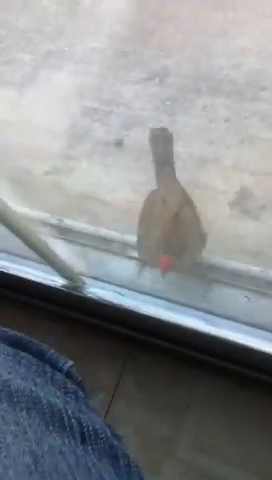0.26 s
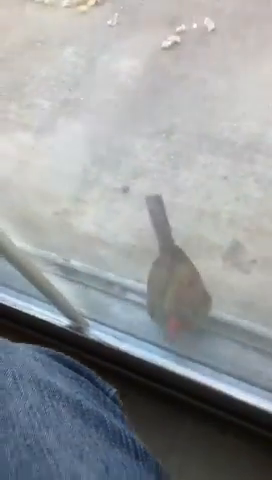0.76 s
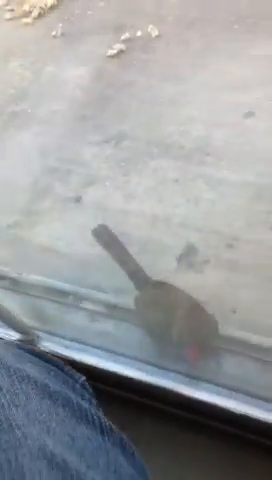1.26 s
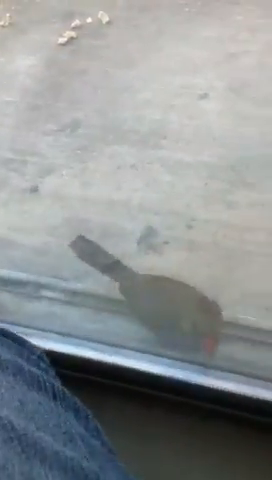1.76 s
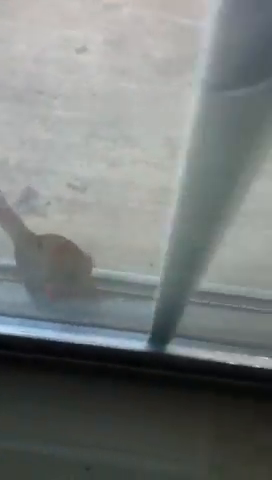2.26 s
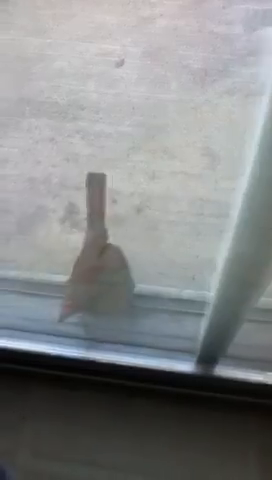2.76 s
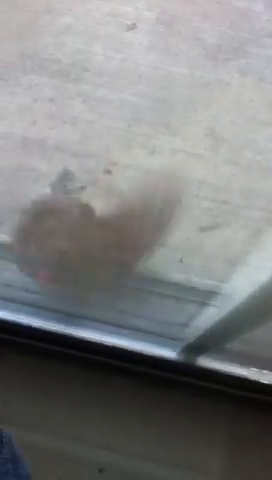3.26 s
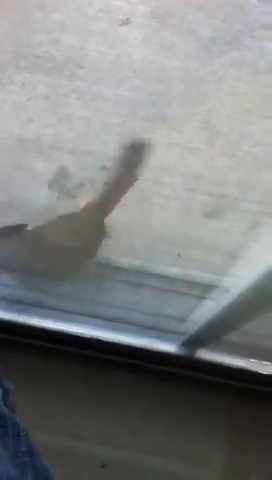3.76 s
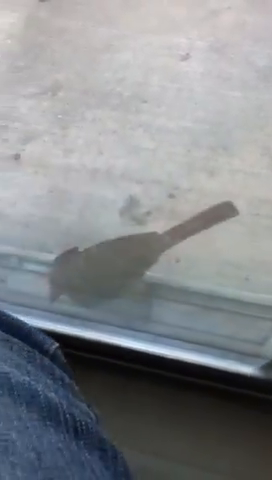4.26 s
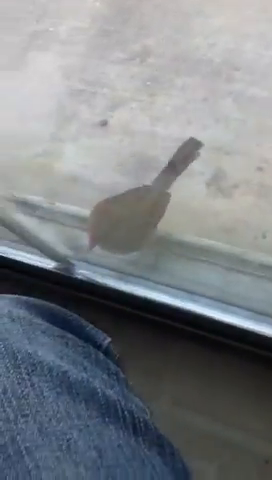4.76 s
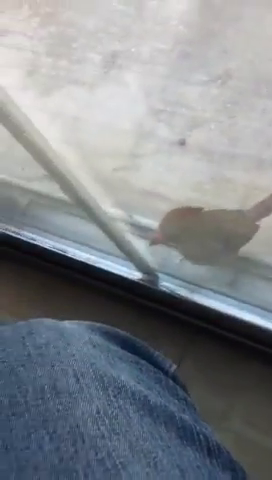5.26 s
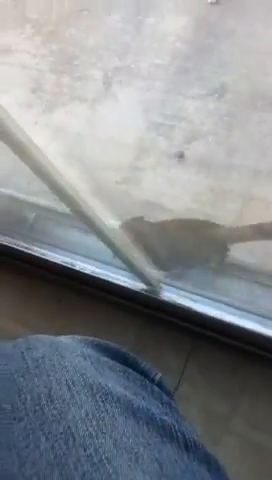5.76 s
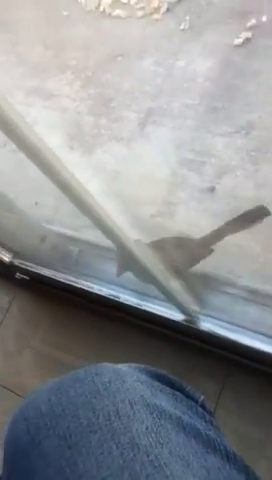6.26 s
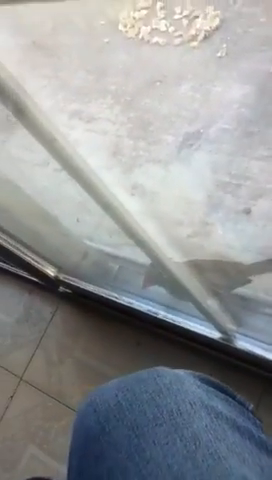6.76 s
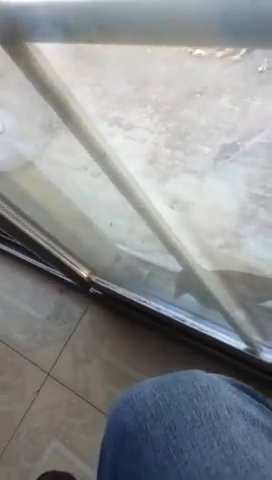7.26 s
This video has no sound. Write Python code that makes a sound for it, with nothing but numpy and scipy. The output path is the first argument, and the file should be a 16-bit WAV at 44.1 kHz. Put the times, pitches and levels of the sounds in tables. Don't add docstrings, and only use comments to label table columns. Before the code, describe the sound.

Irregular glassy pecks, muffled rattling door bumps, gritty claw scratches and soft wing brushes from a bird outside, heard close inside a quiet tiled room.

```python
import sys
import numpy as np
from scipy import signal
from scipy.fft import rfft, irfft
from scipy.io import wavfile
from scipy.ndimage import uniform_filter1d

SR = 44100
rng = np.random.default_rng(int(sys.argv[2]) if len(sys.argv) > 2 else 0)


def wav_record(signal):
    frames = np.transpose(np.atleast_2d(signal))
    bounded = np.clip(frames, -1, 1)
    quanta = np.round(bounded * 32767).astype(np.int16)
    wavfile.write(sys.argv[1], SR, quanta)


def volts(x):
    e = np.asarray(x, float) / 20
    return 10 ** e


N = 330750

# (to the far edge, s*Hz^.5)
PECKS = [(0.651, -32, 0.5, .29), (1.084, -37.5, 3.5, 0.46), (1.139, -38, -3.5, 0.25),
         (1.492, -46, 6.5, 0.61), (2.316, -51, 14, 0.55), (2.727, -54, 14, .43), (3.06, -43.5, 6, 0.56),
         (3.38, -19, -6.5, 0.3), (3.899, -35.5, 3, .36), (4.141, -43.5, -4, .46), (4.224, -36.5, -3, 0.45),
         (4.568, -40, 1.3, .52), (5.025, -48.5, 9.5, 0.56), (5.698, -34.5, 0.5, .38),
         (6.183, -46.5, 9, .44), (6.256, -36.5, -3, 0.47), (7.083, -53, 0, 0.26)]
# start_s, peak_db, treble_db (re bass), tilt_db (per octave), loss_db (per rebound)
BUMPS = [(1.286, -41, -11, -5, 20), (1.566, -19.5, -11.5, -3, 28), (1.579, -8.5, -15, -3.5, 27),
         (1.619, -19, -16.5, -5, 1), (1.662, -15.5, -31, 0.5, 2.5), (1.678, -12.5, -15, -6, 39),
         (1.695, -16, -17, -3, 4.5), (1.909, -24, -9.5, -2.5, 30), (1.925, -20.5, -12.5, -2, 32),
         (1.945, -24, -8.5, -7, 30), (1.969, -15.5, -19, -4, 9), (2.132, -25.5, -15.5, -5, 11),
         (2.18, -23.5, -14.5, -3, 4.5), (2.294, -30.5, -16, -2.5, 28), (2.366, -31, -17.5, -2.5, 20),
         (2.459, -34, -17, -1.5, 20), (2.779, -22.5, -18.5, -6.5, 27), (2.804, -11, -8, -2, 41),
         (2.819, -13, -6, -2, 7), (3.393, -27, -32, -3.5, 4), (3.924, -34.5, -2.5, -3.5, 20),
         (5.897, -35, -11, 4, 3), (6.531, -26, -12.5, 0.5, 2.5), (7.474, -40, -21, 5.5, 20)]
# pitch_hz, level_db, t60_s
DOOR_MODES = [(105.7, -26, 0.63), (149, 2.5, 0.072), (198.1, -3, 0.14), (230.6, -0.5, 0.057),
              (251.5, -2.5, 0.098), (280.6, -13.5, 0.26), (327.7, -0.5, 0.1), (361, -5, 0.16),
              (417.4, -1, 0.14), (527.3, -12, 0.26), (565, -9, 0.12), (605, 1.5, 0.068), (705, -4.5, 0.12),
              (820, -23.5, 0.38), (902, -12, 0.12), (1126, -12.5, 0.1), (1366, -17.5, 0.14),
              (1353, -17, 0.1)]
# pitch_hz, level_db
FRAME_CHATTER = [(530, -25), (900, 6.5), (1670, -2), (1820, -4.5), (3220, -16), (5980, -16.5),
                 (10200, -16.5), (15500, -15)]
# start_s, peak_db, centre_hz, width_octaves
SCRAPES = [(0.6863, -41, 7700, 1.6), (1.096, -38, 3170, 4), (1.1376, -38.5, 3200, 4.8),
           (1.5239, -36.5, 3880, 7.9), (1.5534, -34, 3760, 0.55), (3.458, -35, 5310, 5.5),
           (3.483, -33.5, 3800, 2.4), (3.7154, -47, 7840, 2.5), (3.924, -34.5, 4000, 2.1),
           (3.9414, -39.5, 10400, 0.63), (4.1876, -44.5, 7460, 1.9), (4.2211, -35, 3610, 8.3),
           (4.6164, -32, 4320, 16), (4.635, -35.5, 10200, 0.45), (5.666, -39.5, 4970, 1.8),
           (5.724, -37.5, 3910, 5.2), (6.2141, -37, 3910, 8.5)]
# start_s, peak_db, spot_hz (favoured by the spot touched), width_octaves
SILL_TOUCHES = [(1.104, -55, 2790, .15), (1.142, -62, 2790, .15), (1.141, -56, 6300, .2),
                (4.189, -53, 7400, .2), (2.597, -38, 2000, .4), (3.485, -31, 3600, 1.6),
                (4.615, -30, 2000, 6.1), (5.664, -40.5, 846, 0.23), (5.727, -40, 3850, 0.24),
                (6.217, -56, 3850, 0.17), (6.259, -41, 930, 0.13)]
# pitch_hz, level_db, t60_s
SILL_MODES = [(855, -7, 0.15), (980, -5, 0.045), (1195, 4.5, 0.034), (1900, 8, 0.051), (2170, 4, 0.038),
              (2790, -13, 0.19), (3880, 0, 0.055), (4370, 6, 0.026), (6300, -29, 0.037), (7400, -34, .04)]
# middle_s, level_db (3 dB below the peak), centre_hz, width_octaves
FLICKS = [(0.634, -52, 3500, 1.9), (1.841, -44.5, 5440, 5.2), (2.151, -52, 3000, 1.5),
          (2.608, -45.5, 1900, 1.07), (2.789, -48.5, 5940, 1.1), (3.491, -43.5, 1300, 0.72),
          (3.569, -47, 8600, .53), (3.574, -44.5, 3000, 2.4), (3.85, -54, 1500, .73),
          (3.881, -46.5, 6900, 15), (3.973, -48.5, 2000, 3.7), (4.468, -46.5, 2140, 1.95),
          (4.544, -51.5, 9000, 2.2), (5.645, -47, 10400, .15), (5.653, -45, 6000, 8.5),
          (5.874, -51, 980, 0.6), (5.917, -46.5, 3040, 1.06), (6.09, -53.5, 2980, 1.5)]
# middle_s, level_db (3 dB below the peak), centre_hz, width_octaves, half_length_s
SWEEPS = [
    (2.552, -55.5, 5600, 1.2, 0.22),
    (3.315, -54, 2450, 0.25, 0.064),
    (3.72, -49, 5000, 7.8, 0.085),
    (4.052, -56, 6030, 1.8, 0.23),
    (5.915, -38.5, 930, 1.14, 0.032),
    (6.488, -53.5, 2460, 1.4, 0.18),
    (6.613, -46.5, 1120, 1.6, 0.082),
]
# pitch_hz, t60_s
ROOM_T60 = [(100, 0.32), (500, 0.39), (2000, 0.47), (6000, 0.47), (14000, 0.16)]
# pitch_hz, rms_db
HUM = [(120, -44.5), (2492, -80), (5760, -93), (14992, -122)]
# pitch_hz, density_db (per Hz)
AIR = [(82, -19), (140, -19), (149, -6), (171, -1), (264, -7.5), (309, -3.5), (498, -15.5), (644, -13.5),
       (1100, -22.5), (2160, -26), (2580, -28), (2970, -28), (8150, -31.5), (16000, -37)]
# pitch_hz, density_db (per Hz)
RUMBLE = [(20, -35), (40, -15.5), (70, -10.5), (95, -5.5), (150, -5.5)]

SIZE = 16384
HZ = np.maximum(np.fft.rfftfreq(SIZE, 1 / SR), 1)
T = np.arange(SIZE) / SR


def curve(points, hz):
    point_hz, value = np.transpose(points)
    return np.interp(np.log(hz), np.log(point_hz), value)


def bell(hz, octaves):
    return np.exp(-2 * (np.log2(HZ / hz) / max(octaves, 0.05)) ** 2)


def fading(t60):
    return 1000. ** (-T / t60)


def noise_band(noise, gain):
    return irfft(rfft(noise) * gain)


def add(out, start_s, sound, peak_db):
    i = int(start_s * SR)
    fade = np.clip(5 - 6 * T / T[-1], 0, 1)
    part = (sound * fade)[:N - i]
    out[i:i + len(part)] += part * volts(peak_db) / np.max(np.abs(sound))


def bending(ways, gains, t60):
    late = np.minimum(ways[:, None] / np.sqrt(HZ), T[-1])
    phase = np.exp(-4j * np.pi * ways[:, None] * np.sqrt(HZ))
    return np.sum(gains[:, None] * 1000. ** (-late / t60) * phase, axis=0)


def pecks():
    pane_t60_s, beak_hz = 0.15, 4700
    out = np.zeros(N)
    beak = (HZ / 700) ** 2 / (1 + (HZ / 700) ** 2)
    coincide = 1.2 / (1 + 2.5j * (HZ / 3050 - 3050 / HZ))
    tick = bending(np.array([0.06]), np.array([1.1]), pane_t60_s) / (1 + (HZ / 6000) ** 4)
    push = np.sin(2 * np.pi * 220 * T) * np.exp(-((T - 0.002) / 0.0033) ** 2)
    for start_s, db, push_db, edge_way in PECKS:
        chance = rng.random((2, 40))
        ways = np.r_[edge_way, 0.06 + 1.2 * chance[0] ** 2]
        gains = np.r_[1.7, 0.6 * (2 * chance[1] - 1)]
        echoes = bending(ways, gains, pane_t60_s / (1 + HZ / 5000)) / (1 + (HZ / beak_hz) ** 8)
        add(out, start_s, irfft(-(tick + echoes) * beak * (1 + coincide)), db)
        late = bending(ways[1:] + 0.12, gains[1:], 3.2 * pane_t60_s) * bell(hz=413, octaves=3.18)
        add(out, start_s + 0.00068, push, db + push_db + 0.5)
        add(out, start_s, irfft(late), db + push_db - 0.5)
    return out


def contacts(start_s, db, treble_db, tilt_db, loss_db):
    first_gap_s, stretch = 0.019, 1.45
    k = np.arange(4)
    late = first_gap_s * np.cumsum((k > 0) * stretch ** (k - 1.))
    return np.transpose([start_s + late, db - loss_db * k, treble_db - 2.5 * k, tilt_db - 0.6 * k])


def door_ring(tilt_db, rise_s):
    door_way = 0.0478
    hz, mode_db, t60 = np.transpose(DOOR_MODES)[:, :, None]
    since = np.maximum(T[:SIZE // 2] - door_way / np.sqrt(hz), 0)
    chance = rng.standard_normal((3, len(DOOR_MODES), 1))
    gain = volts(mode_db + tilt_db * np.log2(hz / 300) + 1.7 * chance[0])
    swing = np.sin(2 * np.pi * (hz * (1 + 0.0305 * chance[1]) * since + chance[2]))
    swell = (1 - np.exp(-since / rise_s)) ** 2
    ring = np.sum(gain * swing * swell * 1000. ** (-since / t60), axis=0)
    return np.pad(ring, (0, SIZE // 2))


def frame_chatter(tilt_db, rise_s):
    rough = rng.standard_normal((2, SIZE))
    uneven = volts(10 * uniform_filter1d(rough[0], size=100))
    shiver = (1 - np.exp(-T / (0.73 * rise_s))) * np.exp(-T / 0.025) * uneven
    colour = volts(tilt_db * np.log2(HZ / 300) + curve(FRAME_CHATTER, HZ)) * bell(hz=4000, octaves=2.06)
    return noise_band(rough[1] * shiver, colour)


def bumps():
    faintest_db = -46
    out = np.zeros(N)
    for start_s, db, treble_db, tilt_db in np.concatenate([contacts(*row) for row in BUMPS]):
        if db < faintest_db:
            continue
        rise_s = 0.004 * volts(-0.2 * (db + 27))
        add(out, start_s, door_ring(tilt_db, rise_s), db)
        add(out, start_s, frame_chatter(tilt_db, rise_s), db + treble_db)
    return out


def claw_scrapes():
    out = np.zeros(N)
    for start_s, db, hz, octaves in SCRAPES:
        grit = noise_band(rng.standard_normal(SIZE), bell(hz, octaves))
        t60_s = 0.031 * octaves ** 0.38
        add(out, start_s, grit * (1 - np.exp(-T / 0.0012)) * fading(t60_s), db)
    return out


def sill_rings():
    out = np.zeros(N)
    for start_s, db, spot_hz, octaves in SILL_TOUCHES:
        grit = rng.standard_normal(SIZE)
        ring = np.zeros(SIZE)
        for hz, mode_db, t60_s in SILL_MODES:
            waver = noise_band(grit, bell(hz, octaves=0.12))
            share = volts(mode_db) * np.exp(-2 * (np.log2(hz / spot_hz) / octaves) ** 2)
            tone = np.sin(2 * np.pi * hz * T) + 0.084 * waver / np.std(waver)
            ring += share * tone * fading(t60_s)
        add(out, start_s, ring * (1 - np.exp(-T / 0.00027)), db)
    return out


def feathers():
    out = np.zeros(N)
    flicks = [(*row, 0.024 * row[3] ** 0.2) for row in FLICKS]
    middle = T[-1] / 2
    for middle_s, db, hz, octaves, half_s in flicks + list(SWEEPS):
        hiss = noise_band(rng.standard_normal(SIZE), bell(hz, octaves))
        swell = np.exp(-((T - middle) / half_s) ** 2)
        add(out, middle_s - middle, hiss * swell, db + 3.0)
    return out


def room(x, wet_db):
    tail = np.zeros(SIZE)
    for hz in 100 * 2. ** np.arange(8):
        tail += noise_band(rng.standard_normal(SIZE), bell(hz, 1)) * fading(curve(ROOM_T60, hz))
    tail *= 1 - np.exp(-T / 0.00067)
    tail *= volts(wet_db) / np.sqrt(np.sum(tail ** 2))
    return x + signal.fftconvolve(x, tail)[:N]


def coloured(points, db):
    hz = np.maximum(np.fft.rfftfreq(N, 1 / SR), 1)
    gain = volts(curve(points, hz)) * (hz < points[-1][0])
    x = irfft(rfft(rng.standard_normal(N)) * gain, N)
    return x * volts(db) / np.std(x)


def background():
    t = np.arange(N) / SR
    hum = sum(np.sqrt(2) * volts(db) * np.sin(2 * np.pi * hz * t) for hz, db in HUM)
    air = [(105, AIR[0][1] - 25)] + list(AIR)
    return hum + coloured(air, db=-52) + coloured(RUMBLE, db=-58.5)


def scene():
    touches = pecks() + claw_scrapes() + sill_rings() + feathers()
    bird = room(touches, wet_db=-14.5) + room(bumps(), wet_db=-13)
    reach = signal.butter(3, [75, 12000], "band", fs=SR, output="sos")
    return (signal.sosfilt(reach, bird) + background())[None]


def band_limit(x):
    return signal.sosfilt(signal.butter(12, 16330, fs=SR, output="sos"), x)


def record(dry):
    top = signal.ellip(10, 0.2, 70, 15800, fs=SR, output="sos")
    return band_limit(signal.sosfilt(top, dry))


dry = scene()
out = record(dry)
wav_record(out)
```